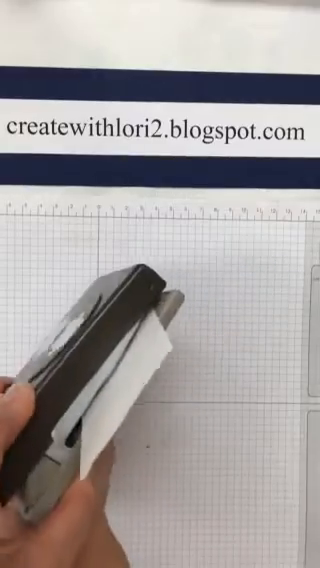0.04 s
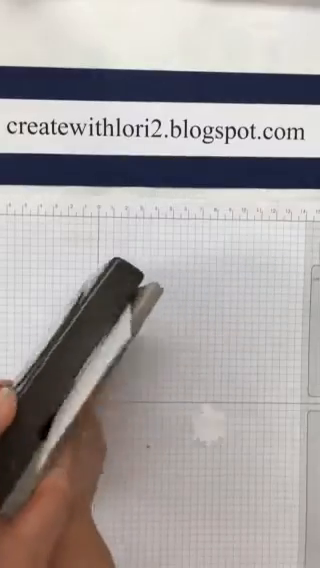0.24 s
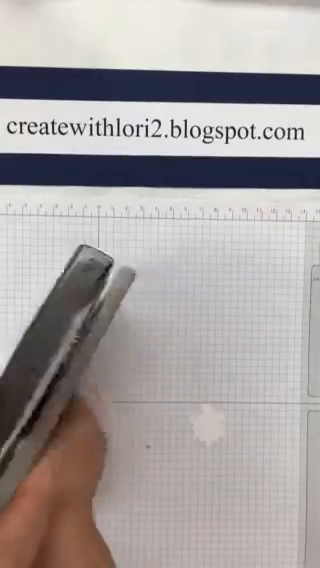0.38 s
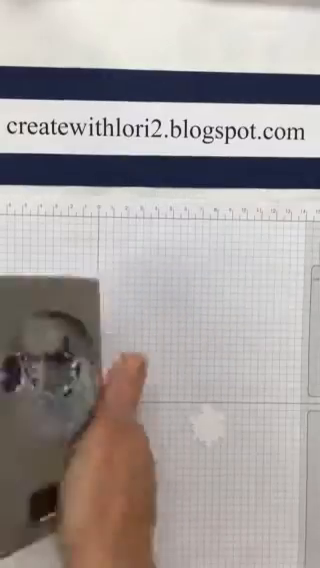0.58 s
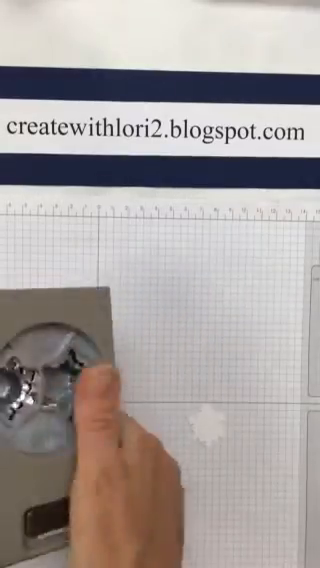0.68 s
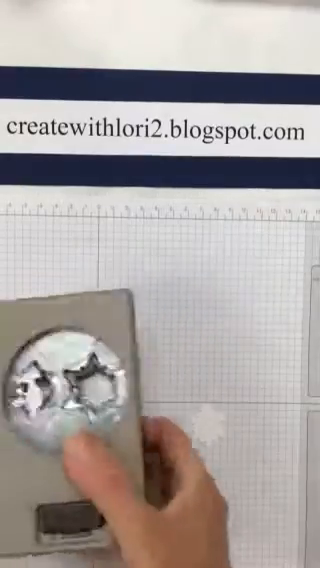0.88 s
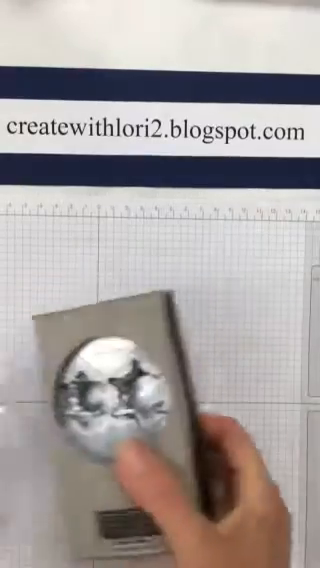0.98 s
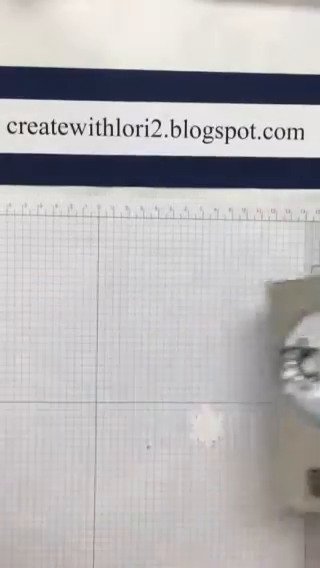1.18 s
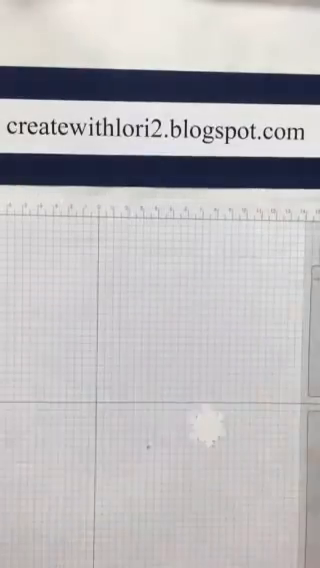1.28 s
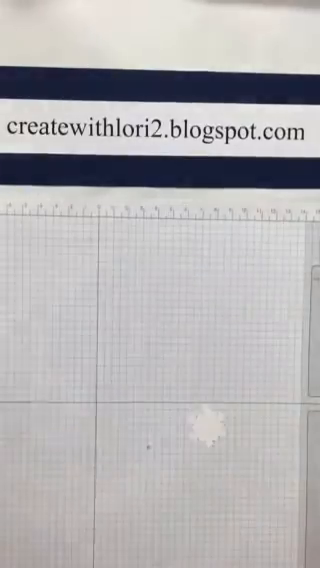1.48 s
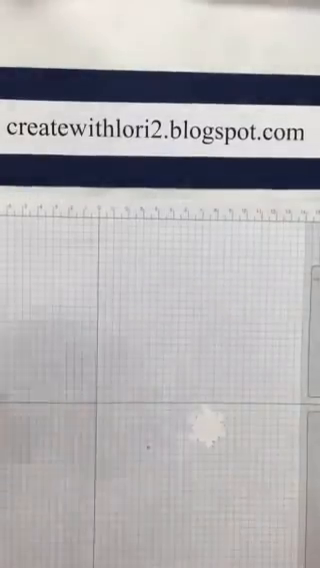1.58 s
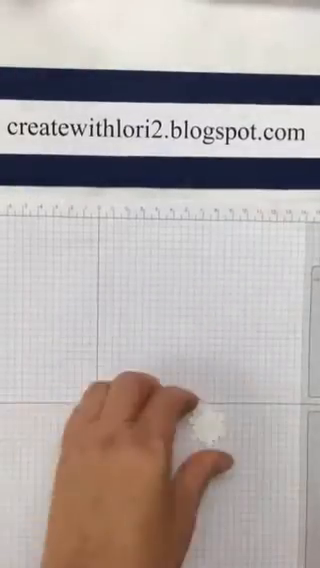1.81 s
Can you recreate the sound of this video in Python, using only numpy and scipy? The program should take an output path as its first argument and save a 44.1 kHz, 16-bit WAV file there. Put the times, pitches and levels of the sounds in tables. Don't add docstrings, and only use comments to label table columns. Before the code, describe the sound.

Close up in a small room, a paper punch cracks down sharply, followed by short gritty rubs of skin on metal, a pause, then a low thud on a hollow tabletop with small metallic ticks and faint rustle.

```python
import sys
import numpy as np
from scipy import signal
from scipy.fft import rfft, irfft, next_fast_len
from scipy.io import wavfile
from scipy.ndimage import uniform_filter1d, map_coordinates

SR = 44100
rng = np.random.default_rng(int(sys.argv[2]) if len(sys.argv) > 2 else 0)


def file_out(sig):
    cols = np.atleast_2d(sig).T
    lim = np.clip(cols, -1, 1)
    pcm = np.round(lim * 32767).astype(np.int16)
    wavfile.write(sys.argv[1], SR, pcm)


def attenuation_scalar(level_db):
    decades = np.asarray(level_db, float) / 20
    return 10 ** decades


N = 81585
T = np.arange(N) / SR


def unit(x):
    return x / np.sqrt(np.mean(x ** 2) + 1e-20)


def along(points, hz):
    f, v = np.transpose(points)
    return np.interp(np.log(hz + 1), np.log(f + 1), v)


def filtered(x, response):
    m = next_fast_len(len(x) + SR // 2)
    return irfft(rfft(x, m) * response(np.fft.rfftfreq(m, 1 / SR)), m)[:len(x)]


def peak(f, hz, wide_hz):
    return 1j * f * wide_hz / (hz * hz - f * f + 1j * f * wide_hz + 1e-9)


def body(modes):
    return lambda f: sum((-1) ** k * attenuation_scalar(db) * peak(f, hz, wide_hz)
                         for k, (hz, wide_hz, db) in enumerate(modes))


def low_cut(f, edge_hz):
    return 1 / (1 + (edge_hz / (f + 1)) ** 8)


def wobble(rate):
    return map_coordinates(rng.standard_normal(int(N * rate / SR) + 4), [T * rate])


def waver(depth):
    return 1 + depth * wobble(55)


def hiss(points):
    return unit(filtered(rng.standard_normal(N), lambda f: attenuation_scalar(along(points, f))))


def window(s, length):
    return np.cos(np.pi * np.clip((T - s) / length, -.5, .5)) ** 2


def patchy(x):
    patch_db = 1
    z = signal.stft(x, nperseg=256)[2]
    field = uniform_filter1d(rng.standard_normal(z.shape), size=8, axis=0)
    field = uniform_filter1d(field, size=4, axis=1)
    return signal.istft(z * attenuation_scalar(patch_db * unit(field)), nperseg=256)[1][:N]


def clicks(table, ring_q=2.2, snap_db=10):
    flat_db, dull_hz, reach = -10.5, 1200, 1.7
    out, t = np.zeros(N + SR), np.arange(SR // 10) / SR
    for s, db, hz, t60 in table:
        shape = attenuation_scalar(-60 * t / t60)
        crackle = rng.standard_normal(len(t)) * shape
        crackle[0] -= attenuation_scalar(snap_db)
        edge = min(dull_hz, hz / 2)

        def metal(f):
            crack = (1j * f / (edge + 1j * f)) ** 2 / (1 + 1j * f / (reach * hz)) ** 2
            return peak(f, hz, hz / ring_q) + attenuation_scalar(flat_db) * crack

        click = filtered(crackle, metal)
        level = attenuation_scalar(db) * np.linalg.norm(shape) / np.linalg.norm(click)
        out[round(s * SR):][:len(t)] += level * click
    return out[:N]


# (frequency [Hz], t60 [s])
ROOM = [(150, 0.34), (400, 0.4), (700, 0.34), (2000, 0.32), (5000, 0.25), (10000, 0.23), (15000, 0.2)]


def decay(tone):
    hz, t, z = signal.stft(rng.standard_normal(SR // 2), SR, nperseg=256)
    dying = z * attenuation_scalar(-60 * t / along(ROOM, hz)[:, None])
    tail = signal.istft(dying, SR, nperseg=256)[1]
    return filtered(tail, lambda f: attenuation_scalar(along(tone, f)))


# (frequency [Hz], level [dB])
ROOM_TONE = [(150, -0.5), (600, -6), (15000, -14.5)]


def room(x, wet_db):
    tail = np.pad(decay(ROOM_TONE), (round(.004 * SR), 0))
    return x + attenuation_scalar(wet_db) * signal.fftconvolve(x, tail / np.linalg.norm(tail))[:N]


# (frequency [Hz], level [dB per Hz])
AIR = [(15, -50), (25, -31.5), (44, -10), (140, -2), (240, -4), (274, -11.5), (410, -9), (445, -15.5),
       (15500, -28.5)]
# (time [s], level [dB])
AIR_LEVEL = [(0, -66), (.2, -68.5), (.4, -77), (.5, -77.5), (.57, -66), (.85, -64.5), (1.2, -66.5),
             (1.85, -64)]


def room_air():
    level_db = np.interp(T, *np.transpose(AIR_LEVEL)) + 0.9 * wobble(36)
    return attenuation_scalar(level_db) * hiss(AIR)


# (frequency [Hz], level [dB], t60 [s])
LINGER = [(1000, -62, .26), (1136, -61, .7), (2060, -71.5, 0.47), (2256, -73, .3), (2562, -73.5, .3)]
# (frequency [Hz], level [dB per Hz])
FADE_TONE = [(300, -21), (900, -3), (1200, 2), (2500, -5.5), (6000, -11), (15000, -18)]


def earlier_click():
    ring = np.zeros(N)
    for hz, db, t60 in LINGER:
        level = attenuation_scalar(db - 60 * T / t60) * waver(.45)
        ring += level * np.sin(2 * np.pi * (hz * T + rng.random()))
    return ring + attenuation_scalar(-60 - 60 * T / .4) * hiss(FADE_TONE)


# (time [s], level [dB], ring [Hz], t60 [s])
TICKS = [(.024, -58, 11200, 0.0099), (.094, -63, 10300, .015), (.1385, -55, 4800, 0.018),
         (.1388, -49, 10800, 0.017), (.31, -30.5, 9500, 0.0066), (.339, -33, 5456, 0.023),
         (.5745, -57.5, 6000, 0.016), (.593, -53.5, 1140, 0.016), (.84, -57.5, 1500, 0.023),
         (1.32, -61.5, 9000, 0.015), (1.426, -50, 5150, 0.014), (1.5553, -39.5, 6490, 0.034),
         (1.557, -50, 3200, 0.037), (1.56, -38, 2900, 0.017), (1.5753, -27, 4610, 0.019),
         (1.5765, -35.5, 7460, 0.014), (1.577, -31, 2300, 0.019), (1.5808, -31.5, 4700, 0.011),
         (1.581, -33, 2464, 0.013), (1.583, -40, 7730, 0.011), (1.588, -39.5, 2382, 0.072),
         (1.591, -40, 6900, 0.012), (1.602, -59, 2580, 0.05), (1.653, -51, 2980, 0.016)]


def mechanism():
    return clicks(TICKS)


# (time [s], level [dB], ring [Hz], t60 [s])
CUT = [(.189, -46, 2640, 0.043), (.1945, -47.5, 11500, 0.06), (.1965, -42, 4750, 0.012),
       (.2005, -50.5, 9100, 0.039), (.199, -44, 1200, 0.27), (.2118, -29.5, 3700, 0.021),
       (.2138, -15, 2640, 0.025), (.2165, -18.5, 860, 0.019), (.2175, -10.5, 11400, 0.024),
       (.2185, -14.5, 5340, 0.031), (.2192, -5, 2460, 0.0083), (.2208, -9.5, 650, 0.008),
       (.2225, -19, 4500, 0.005), (.2275, -18, 1729, 0.005), (.235, -21, 1650, .03),
       (.252, -18, 1790, 0.027), (.27, -22.5, 999, .02)]


def cut():
    return clicks(CUT)


# (time [s], level [dB])
JOLT = [
    (0.1984, -45.5),
    (0.208, -31),
    (.222, -18),
]


def hand_jolt():
    pushes = sum(attenuation_scalar(db) * window(s, 0.0026) for s, db in JOLT)
    return filtered(pushes, lambda f: 2 * peak(f, 70, 120))


# (frequency [Hz], level [dB per Hz])
CUT_TONE = [(150, -17), (400, -18.5), (480, -2.5), (650, 3), (1500, -3), (3000, -1), (8000, -7),
            (15000, -16)]


def wall_tail():
    return decay(CUT_TONE)


def cut_echo(tail):
    echo = np.zeros(N)
    echo[round(.221 * SR):][:len(tail)] = attenuation_scalar(-19) * tail / np.std(tail[:SR // 50])
    return patchy(echo)


# (frequency [Hz], level [dB], t60 [s])
STEEL = [(660, -23.5, 0.26), (941, -26.5, .25), (1343, -28, .3), (1445, -30.5, 0.31), (1646, -30, 0.32),
         (1851, -28.5, .24), (2160, -29, .18), (2554, -28.5, 0.25), (2780, -26, 0.18), (3200, -31.5, .17),
         (3416, -30.5, 0.17), (4470, -33, .2), (4890, -32.5, .17)]


def steel():
    u = np.maximum(T - .222, 0)
    rise = 1 - np.exp(-u / 0.014)
    return sum(attenuation_scalar(db - 60 * u / t60) * waver(.9) * rise * np.sin(2 * np.pi * hz * u)
               for hz, db, t60 in STEEL)


# (time [s], pressure [dB], brightness [0-1])
SLIDES = [
    [(.606, -53, 0.4), (.61, -54, 0.31), (.627, -44.5, 0.8), (.65, -46.5, 0.67), (.685, -41.5, 0.14),
     (.711, -35.5, 0.34), (.735, -46.5, 0.1), (.77, -61.5, 0.2), (.83, -78.5, 0.6)],
    [(.82, -72, .3), (.845, -64, 0.34), (.872, -52, 0.1), (.9, -51.5, 0.26), (.925, -58, 0.54),
     (.945, -60, 0.3), (.96, -55, .5)],
    [(.958, -58, .1), (.972, -44.5, 0), (.982, -46, 0), (1.005, -38.5, 0.6), (1.027, -37, 0.47),
     (1.053, -35, 0.85), (1.062, -44, 0.58), (1.083, -48, 0), (1.11, -100, .4)],
]
SLIDE_EDGE_HZ = [1000, 700, 800]
# (frequency [Hz], width [Hz], level [dB])
DIE = [
    [(1290, 170, 9.5), (1910, 62, 13.5), (3840, 210, -4)],
    [(1760, 270, -10.5), (3700, 303, 7)],
    [(1030, 130, -11), (2410, 250, 4.5), (4400, 200, -3.5)],
]
# (frequency [Hz], level [dB per Hz])
SKIN_DULL = [(300, 12), (800, -6), (1300, -4.5), (2000, -5), (2800, -2), (4000, -7), (8000, -9),
             (15500, -24.5)]
SKIN_BRIGHT = [(300, 5), (800, 5.5), (1500, -12.5), (3000, -9.5), (6000, -1), (10400, 1), (13000, -2),
               (15500, -5.5)]


def finger_slides():
    grains_per_s, grain_spread_db, grain_share, jerk_db = 1800, 10, 0.74, 0.5
    out = np.zeros(N)
    for rows, edge_hz, hollows in zip(SLIDES, SLIDE_EDGE_HZ, DIE):
        s, pressure_db, bright = np.transpose(rows)
        slips = rng.random(N) < grains_per_s / SR
        grains = slips * attenuation_scalar(grain_spread_db * rng.random(N)) * rng.standard_normal(N)
        friction = patchy(unit(grains) * grain_share + rng.standard_normal(N))
        rub = filtered(friction, lambda f: (1 + body(hollows)(f)) * (0.0272 + low_cut(f, edge_hz)))
        dull = unit(filtered(rub, lambda f: attenuation_scalar(along(SKIN_DULL, f))))
        sharp = unit(filtered(rub, lambda f: attenuation_scalar(along(SKIN_BRIGHT, f))))
        mix = np.clip(np.interp(T, s, bright), 0, 1) * np.pi / 2
        level_db = np.interp(T, s, pressure_db, -120, -120) + jerk_db * wobble(120)
        out += attenuation_scalar(level_db) * (np.cos(mix) * dull + np.sin(mix) * sharp)
    return out


# (time [s], level [dB], ring [Hz], t60 [s])
CATCHES = [(.609, -46, 2820, 0.033), (.62, -39, 1285, 0.036), (.625, -34.5, 10160, 0.0191),
           (.631, -36.5, 2432, 0.025), (.6871, -38, 1350, 0.038), (.691, -58, 1290, 0.035),
           (.699, -37, 1340, 0.14), (.7076, -36.5, 4000, 0.018), (.7085, -33, 1990, 0.071),
           (.7135, -42, 1160, 0.029), (.72, -41, 1730, 0.034), (.7365, -36, 6550, .006),
           (.966, -46, 1498, 0.051), (.9748, -39, 2320, 0.027), (.9793, -43, 2590, .02),
           (.9833, -33, 2398, 0.019), (.9885, -33, 2316, 0.039), (1.0025, -32, 4540, .02),
           (1.0045, -33, 2510, 0.027), (1.0155, -30, 5000, 0.012), (1.0228, -31.5, 2580, .035),
           (1.0255, -34, 4400, 0.03), (1.0355, -23.5, 7950, 0.0067), (1.044, -36, 3000, .015),
           (1.049, -37.5, 1100, 0.029), (1.0505, -32, 10500, .015), (1.056, -26, 10970, 0.011),
           (1.079, -41, 3200, 0.02)]


def skin_catches():
    return filtered(clicks(CATCHES, ring_q=11, snap_db=3), lambda f: low_cut(f, 1000))


# (time [s], level [dB])
LIFT = [
    (.705, -68),
    (.72, -54),
    (.75, -52.5),
    (.775, -76.5),
]
# (frequency [Hz], level [dB per Hz])
PALM = [(100, -17.5), (200, -3.5), (400, 0), (900, -2.5), (1500, -23.5)]


def palm_shift():
    return attenuation_scalar(np.interp(T, *np.transpose(LIFT), -120, -120)) * hiss(PALM)


# (time [s], level [dB])
SETTLE = [
    (1.4, -88),
    (1.45, -64.5),
    (1.54, -76.5),
    (1.6, -53),
    (1.64, -70),
    (1.695, -61),
    (1.73, -73.5),
    (1.79, -74),
    (1.85, -76),
]
# (frequency [Hz], level [dB])
PAPER = [(1200, -22.5), (5500, 0.5), (15000, -11.5)]


def paper_rustle():
    level_db = np.interp(T, *np.transpose(SETTLE), -120) + 0.83 * wobble(100)
    return attenuation_scalar(level_db) * hiss(PAPER)


# (time [s], level [dB], t60 [s])
WOOD_HITS = [
    (1.447, -23, 0.07),
    (1.448, -29, 0.24),
    (1.49, -43, 0.12),
    (1.51, -42.5, 0.46),
]
# (frequency [Hz], level [dB per Hz])
WOOD = [(200, 7), (300, 8.5), (550, -6), (1000, -17.5), (1600, -27.5), (2200, -51)]


def wood_rattle():
    level = np.zeros(N)
    for s, db, t60 in WOOD_HITS:
        rise = (1 - np.exp(-np.maximum(T - s, 0) / 0.00091)) ** 2
        level += attenuation_scalar(db - 60 * np.abs(T - s) / t60) * rise
    return level * hiss(WOOD)


# (centre time [s], level [dB], length
# [s], pad bounce [Hz])
KNOCKS = [(1.4498, -21, .005, 300), (1.4562, -7.5, .021, 156), (1.4705, -23, .014, 200),
          (1.48, -24, .018, 180), (1.4886, -16, 0.017, 195), (1.506, -23.5, .03, 125),
          (1.5255, -16.5, 0.02, 160), (1.5415, -30, .016, 170), (1.548, -28, .016, 190),
          (1.567, -20.5, 0.046, 138), (1.594, -28.5, 0.04, 185), (1.685, -29, 0.018, 140),
          (1.702, -34, 0.082, 138.2), (1.694, -51.5, 0.016, 545), (1.757, -36, 0.033, 154),
          (1.771, -34.5, 0.024, 150), (1.805, -42, 0.038, 127), (1.76, -48.5, 0.068, 49),
          (1.815, -50, .08, 45), (0.165, -64, 0.025, 130)]
# (frequency [Hz], width [Hz], level [dB])
TABLE = [(56, 9, 7), (112, 10, -7), (140, 10, -9), (197, 14, -1), (222, 13, -1), (280, 14, 9)]


def table_knocks():
    lag_s = .0005
    bounce = sum(-attenuation_scalar(db) * window(s + lag_s, length) * np.cos(2 * np.pi * hz * (T - s))
                 for s, db, length, hz in KNOCKS)
    return bounce + attenuation_scalar(-16) * filtered(bounce, body(TABLE))


def scene():
    air = room_air()
    before = earlier_click()
    tail = wall_tail()
    punch = cut() + steel() + cut_echo(tail) + hand_jolt()
    ticks = room(mechanism(), -16.5)
    handling = room(palm_shift() + finger_slides() + skin_catches() + paper_rustle(), -23.5)
    table = room(wood_rattle() + table_knocks(), -24)
    return (before + punch + ticks + handling + table + air)[None]


def top_cut(x):
    return signal.sosfilt(signal.butter(12, 16460, fs=SR, output="sos"), x)


def record(dry):
    ceiling = .76
    soft = dry[0] / (1 + np.abs(dry[0] / ceiling) ** 4) ** .25
    mix = filtered(soft, lambda f: 1 / (1 + (f / 15400) ** 60))[None]
    return top_cut(mix)


dry = scene()
out = record(dry)
file_out(out)
```